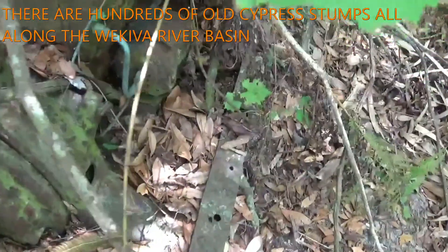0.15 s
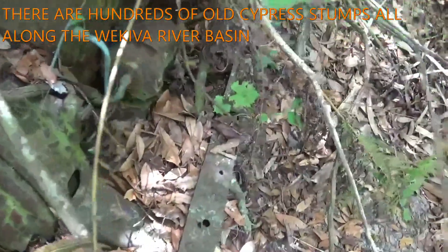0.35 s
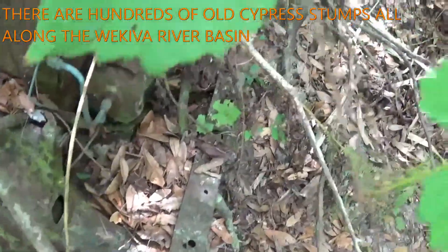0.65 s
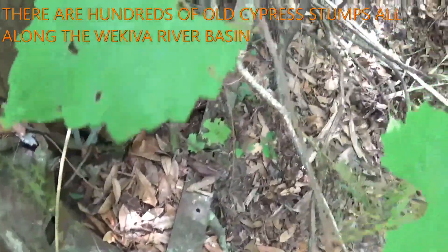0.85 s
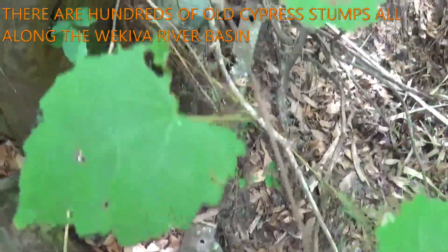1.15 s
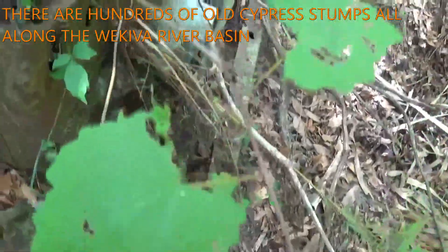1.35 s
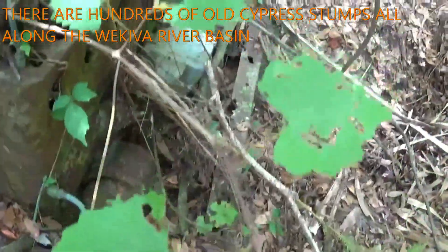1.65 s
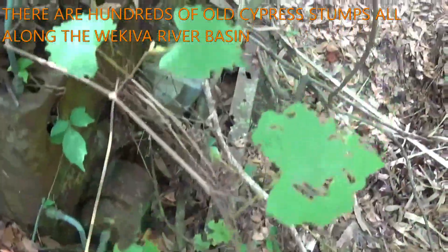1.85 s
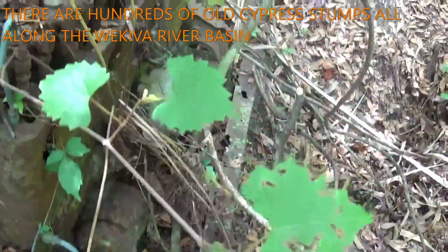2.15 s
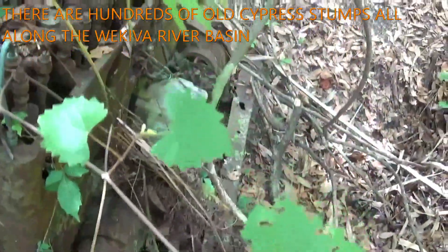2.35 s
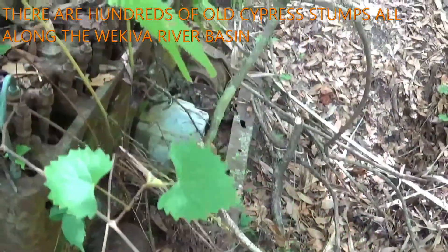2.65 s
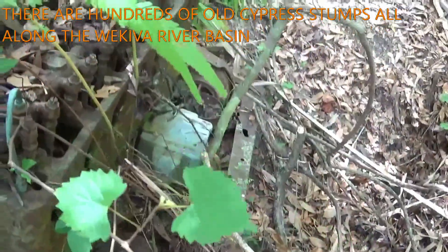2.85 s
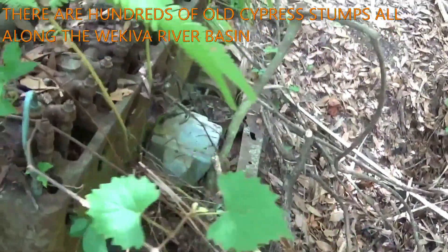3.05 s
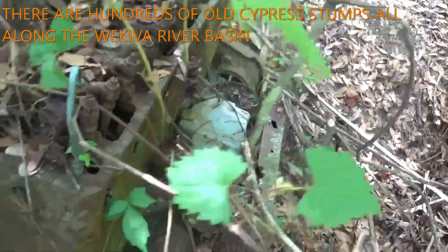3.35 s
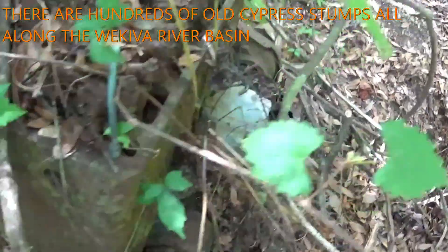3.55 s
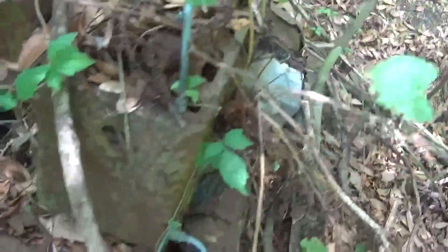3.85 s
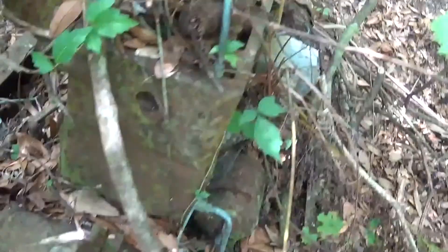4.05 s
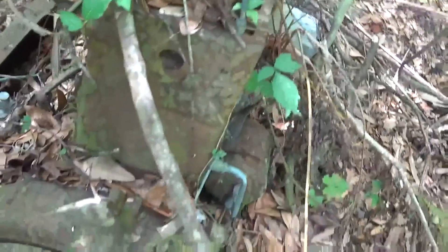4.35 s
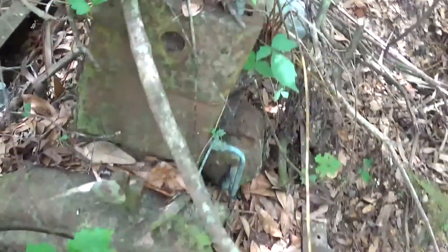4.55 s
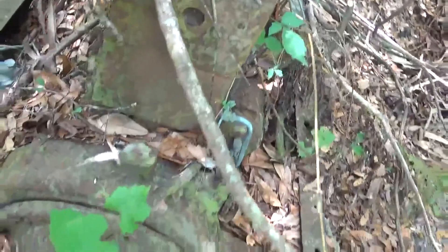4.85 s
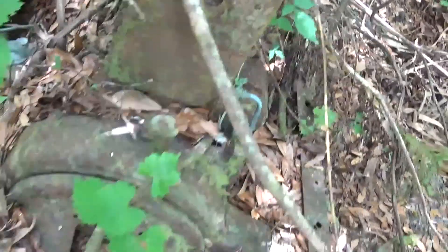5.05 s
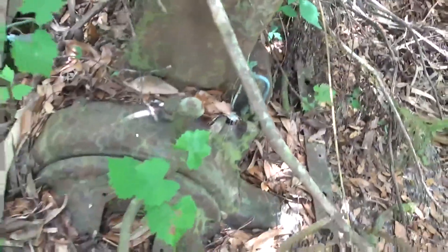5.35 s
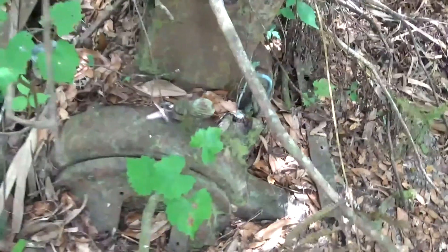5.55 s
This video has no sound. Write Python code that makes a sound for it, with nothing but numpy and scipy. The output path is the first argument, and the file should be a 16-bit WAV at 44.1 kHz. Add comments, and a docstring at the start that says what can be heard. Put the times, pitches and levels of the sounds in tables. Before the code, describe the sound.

Close stereo microphone over a leafy woodland floor: crisp leaves crackle and scratch as someone shifts weight, a twig snaps, then it nearly quiets. One bright, heavy crush follows, then sparse ticks, a renewed bout of rustling with a woody stick crack, and loose single snaps. The sound is dry and crisp, with soft hiss, gentle rumble and a wavering faint hum beneath.

```python
"""Slow footsteps through dry leaf litter and twigs in a wood, heard close by over a thin hiss and a faint, far hum.
Leaves and stalks snap one by one: each snap is a click with bursts of noise, coloured by what breaks.
The rustle and one heavy crush are crowds of tiny decaying sine grains mixed with noise; scrapes are short strokes of them.
A twig, a stick and a stalk ring as fading sines. The hiss and a low rumble are coloured noise; the hum is a wavering sine."""
import sys
import numpy as np
from scipy.fft import rfft, irfft, next_fast_len
from scipy.io import wavfile
from scipy.ndimage import uniform_filter1d, map_coordinates

SR = 44100
rng = np.random.default_rng(int(sys.argv[2]) if len(sys.argv) > 2 else 0)


def store_wav(level_fs):
    """Save 16-bit WAV to argv[1]."""
    pcm = np.round(np.clip(np.atleast_2d(level_fs), -1, 1) * 32767)
    wavfile.write(sys.argv[1], SR, pcm.T.astype(np.int16))


N = 252252
TOP_HZ = 11120  # the whole sound stops steeply here

# How hard the feet work in the litter: (time [s], effort [dB])
EFFORT = [(0, -39.5), (.13, -37), (.24, -46.5), (.33, -44), (.42, -52), (.75, -51), (1.0, -57), (1.17, -55),
          (1.3, -65), (1.72, -63), (2.16, -50.5), (2.28, -53), (2.68, -58.5), (2.78, -45.5), (3.12, -52),
          (3.39, -42), (3.9, -50.5), (4.15, -54.5), (4.43, -49), (4.75, -54), (5.72, -51)]


def amp(db):
    """Turn decibels into a plain factor."""
    return 10 ** (np.asarray(db) / 20)


def unit(x):
    """Scale x to an rms of 1."""
    return x / np.sqrt(np.mean(x ** 2) + 1e-20)


def along(points, hz):
    """Read a curve of (frequency [Hz], value) points on a log frequency axis."""
    f, value = np.transpose(points)
    return np.interp(np.log(hz + 1), np.log(f + 1), value)


def curves(rows):
    """One value per sample for each column after the time."""
    s, *columns = np.transpose(rows)
    return [np.interp(np.arange(N) / SR, s, column) for column in columns]


def wobble(rate):
    """A smooth random curve with this many random points a second."""
    points = rng.standard_normal(int(N * rate / SR) + 4)
    return map_coordinates(points, [np.arange(N) * rate / SR])


def filtered(x, response):
    """Multiply the spectrum of x by a response that depends on frequency."""
    m = next_fast_len(N + SR // 2)  # spare room, so that the end does not wrap round
    hz = np.fft.rfftfreq(m, 1 / SR)
    return irfft(rfft(x, m) * response(hz), m)[..., :N]


def coloured(x, spectrum):
    """Give x a colour of (frequency [Hz], level [dB]) points, at rms 1."""
    return unit(filtered(x, lambda hz: amp(along(spectrum, hz))))


def causal(gain):
    """The minimum-phase response with this gain: it rings only after the blow."""
    cepstrum = irfft(np.log(gain + 1e-6))
    half = len(cepstrum) // 2
    cepstrum[1:half] *= 2
    cepstrum[half + 1:] = 0
    return np.exp(rfft(cepstrum))


def noise_pair(width):
    """Stereo white noise; width is the side signal over the middle one."""
    mid, side = rng.standard_normal((2, N))
    return unit(np.array([mid + width * side, mid - width * side]))


def add(track, s, sound):
    """Mix a sound in at time s [s]."""
    start = max(0, round(s * SR))
    part = sound[..., :max(0, N - start)]
    track[..., start:start + part.shape[-1]] += part


def swells(rows, attack, fall_db_per_s):
    """The gain of (time [s], hold [s], level [dB]) events that rise, hold and die away."""
    t = np.arange(N) / SR
    power = 0
    for s, hold, db in rows:
        rise = np.clip((t - s) / attack, 0, 1)
        fall_db = fall_db_per_s * np.maximum(t - s - hold, 0)
        power = power + (rise * amp(db - fall_db)) ** 2
    return np.sqrt(power)


def crackle(rate, spread_db, cycles, pitch_hz, pan_db, size=128):
    """Tiny leaf fractures, each a few cycles long: most are weak, a few are strong."""
    when, pitch, strength, side, life = rng.random((int(rate * N / SR), 5)).T[..., None]
    hz = pitch_hz * 2 ** (2 * pitch - 1)  # up to an octave either way
    k = np.arange(size)
    phase = hz * k / SR  # in cycles
    gain = amp(-spread_db * np.log(strength + 0.074))
    grains = gain * np.sin(2 * np.pi * phase) * np.exp(-phase / (cycles * (.5 + life)))
    index = ((when * N).astype(int) + k).ravel()
    pair = []
    for ear in (1, -1):
        panned = grains * amp(ear * pan_db * (side - .5))
        pair.append(np.bincount(index, panned.ravel(), N)[:N])
    return unit(np.array(pair))


def whitened(x, size=3001):
    """Even out the long-term colour of x."""
    z = rfft(x)
    power = uniform_filter1d(np.mean(np.abs(z) ** 2, 0), size)
    return unit(irfft(z / np.sqrt(np.abs(power) + 0.00051 * power.mean()), N))


def background(hiss_db=-57, rumble_db=-54.0, hum_hz=109, drift_db=2):
    """A steady hiss and a low rumble of coloured noise, with a far hum that wavers in level and pitch."""
    # Colour of the hiss: (frequency [Hz], level [dB per Hz])
    air_colour = [(150, -10.5), (250, -1.5), (887, -9.5), (1020, -10), (1180, -11), (1280, -11.5),
                  (2960, -14.5), (3990, -15), (9240, -14), (11000, -20), (14300, -56), (22000, -120)]
    # Colour of the rumble: (frequency [Hz], level [dB per Hz])
    rumble_colour = [(12, -38), (20, -26), (38, 1), (65, -2), (102, 2.5), (242, -10), (323, -16),
                     (400, -24.5), (520, -53), (880, -120)]
    # The hum comes and goes: (time [s], level [dB])
    hum_level = [(0, -60), (4.1, -62), (4.5, -57), (5.2, -57.5), (5.72, -62)]
    hum_db, = curves(hum_level)
    phase = 2 * np.pi * hum_hz * np.arange(N) / SR
    strength = amp(drift_db * wobble(3.05)) * (1 + 0.59 * wobble(14))
    hum = unit(strength * np.sin(phase + 1.77 * wobble(14)))
    rumble = coloured(noise_pair(width=0.055), rumble_colour)
    hiss = coloured(noise_pair(width=0.7), air_colour)
    return amp(hiss_db) * hiss + amp(rumble_db) * rumble + amp(hum_db) * hum


def ringing(event, modes, attack=0.00037):
    """The freed end of broken wood rings briefly, as a sum of fading sines."""
    out, t = np.zeros(N), np.arange(SR // 10) / SR
    s, db = event
    ring = 0
    for hz, level, t60 in modes:
        ring = ring + amp(db + level - 60 * t / t60) * np.sin(2 * np.pi * hz * t)
    add(out, s, ring * (1 - np.exp(-t / attack)))
    return out


def breaking_wood():
    """A thin twig, a thick stick and a dry stalk give way; each rings at its own few pitches."""
    # When each breaks: (time [s], level before the mode levels are added [dB])
    twig_break = (0.7958, -19.5)
    stick_break = (3.6975, -29)
    stalk_break = (5.0386, -35)
    # How each rings: (frequency [Hz], level against the break [dB], time to fall 60 dB [s])
    twig_modes = [(1400, -5, 0.014), (1900, -1, 0.016), (2540, -17, 0.012), (3950, 6, .009),
                  (6440, 0.5, 0.039), (7149, -2, .022)]
    stick_modes = [(195, -10.5, 0.07), (770, 3, .024), (1150, 0, 0.022), (1700, 2, 0.023)]
    stalk_modes = [(3050, 0, .02)]
    twig = ringing(twig_break, twig_modes)
    stick = ringing(stick_break, stick_modes)
    return twig + stick + ringing(stalk_break, stalk_modes)


def scrapes(level_db=3.0, fade_db=5, edge=0.0065):
    """A leaf dragged across its neighbours catches many times: a short, even scratch."""
    # Leaves sliding over one another: (time [s], length [s], level before level_db [dB])
    strokes = [(0.775, 0.066, -42), (1.042, 0.063, -50), (1.426, 0.061, -46.5), (2.417, 0.029, -48),
               (3.205, .04, -44), (3.7, 0.045, -45), (4.395, 0.065, -45.5), (4.708, .025, -45),
               (5.407, .02, -47), (5.488, 0.057, -44)]
    # Colour of the sliding: (frequency [Hz], level [dB per Hz])
    slide_colour = [(200, -18), (700, -4), (1600, -2), (3500, -7.5), (6000, -1.5), (9000, 2), (11000, 0.5)]
    gain, t = np.zeros(N), np.arange(SR // 5) / SR
    for s, length, db in strokes:
        stroke = np.clip(np.minimum(t, length - t + edge) / edge, 0, 1)
        add(gain, s, stroke * amp(db + level_db - fade_db * t / length))
    grains = crackle(rate=2000, spread_db=5.0, cycles=1.8, pitch_hz=4930, pan_db=8)
    catches = whitened(grains) + 0.61 * noise_pair(width=0.51)
    return gain * coloured(catches, slide_colour)


def rustle(crisp_db=-1, packed_db=-62, scuff_db=-68, press_db=-2, thud_db=-1):
    """Shifting weight cracks crisp leaves in clumps; a sinking sole creases packed ones, scuffs soil and thuds."""
    # A sole sinks in: (time [s], hold [s], packed leaves before press_db [dB], soil before press_db [dB])
    presses = [(0, 0.093, -50, -52), (.07, .06, -45, -49), (.25, 0.13, -52.5, -54.5),
               (0.403, 0.055, -55, -57), (.54, .13, -52.5, -50), (0.858, 0.05, -58, -54),
               (1.79, .04, -64, -47.5), (2.016, .13, -60, -60.5), (2.532, 0.027, -59, -60),
               (3.11, .1, -69, -59), (3.208, .1, -64, -52.5), (3.35, .07, -55, -59), (4.38, .06, -58, -61)]
    # Colours of the top leaves, the packed leaves, the soil and the ground under a sole:
    # (frequency [Hz], level [dB per Hz])
    crisp_colour = [(880, -67), (1500, -12.5), (1950, -15), (4280, -16), (5970, -7), (6670, -7.5),
                    (9370, -1.5), (10900, -8), (11500, -60), (15000, -49), (22000, -120)]
    packed_colour = [(300, -13.5), (800, -2), (1500, -3.5), (3000, 1.5), (6000, -8.5), (11000, -21)]
    soil_colour = [(120, -17), (300, -4), (550, -3.5), (900, -6), (1500, -10), (4000, -37)]
    thud_colour = [(20, -20), (45, 1.5), (90, -2), (170, -5), (330, -16), (700, -50)]
    usual_effort_db = -52
    packed_follows, soil_follows = 0.54, 0.3  # deeper layers answer the effort less [dB per dB]
    attack, fall_db_per_s = 0.023, 98

    effort_db, = curves(EFFORT)
    extra_db = effort_db - usual_effort_db
    s, hold, leaves_db, soil_db = np.transpose(presses)
    on_leaves = swells(zip(s, hold, leaves_db + press_db), attack, fall_db_per_s)
    on_soil = swells(zip(s, hold, soil_db + press_db), attack, fall_db_per_s)
    clumps = wobble(85)

    fine_grains = crackle(rate=650, spread_db=6.5, cycles=2.4, pitch_hz=6650, pan_db=3.5)
    fine = whitened(fine_grains) + 0.55 * noise_pair(width=0.42)
    top = amp(effort_db + crisp_db + 2.63 * clumps) * coloured(fine, crisp_colour)

    coarse_grains = crackle(rate=400, spread_db=3.5, cycles=2.0, pitch_hz=2330, pan_db=15.5, size=256)
    coarse = whitened(coarse_grains) + 1.27 * noise_pair(width=0.67)
    packed_gain = np.hypot(on_leaves, amp(packed_db + packed_follows * extra_db))
    under = packed_gain * amp(1.5 * clumps) * coloured(coarse, packed_colour)

    soil_gain = np.hypot(on_soil, amp(scuff_db + soil_follows * extra_db))
    scuff = soil_gain * amp(3.7 * wobble(45)) * coloured(noise_pair(width=0.51), soil_colour)
    thud = on_leaves * amp(thud_db) * coloured(noise_pair(width=0.12), thud_colour)
    return top + under + scuff + thud


def crush(spurt_db=1.35):
    """A full step breaks thousands of leaves in quick spurts and dies away as the heap packs down."""
    # The heavy step lands, settles and rolls forward: (time [s], hold [s], level [dB])
    step = [(1.769, .1, -28.5), (1.96, 0.09, -46.5), (2.046, 0.022, -39)]
    # Colour of the breaking heap: (frequency [Hz], level [dB per Hz])
    heap_colour = [(88, -48), (150, -16), (415, -20), (497, -17.5), (755, -15.5), (842, -14), (1330, -12),
                   (2790, -7.5), (5360, -8.5), (9250, -1), (10900, -8.5), (11500, -45), (15000, -57),
                   (22000, -120)]
    weight = swells(step, attack=0.0098, fall_db_per_s=151)
    grains = crackle(rate=3500, spread_db=5, cycles=1.4, pitch_hz=6100, pan_db=3)
    breaks = whitened(grains) + 0.8 * noise_pair(width=0.45)
    return weight * amp(spurt_db * wobble(130)) * coloured(breaks, heap_colour)


def small_snaps():
    """Rows for snaps() at random moments, louder where the feet work harder."""
    per_s, over_effort_db, level_spread_db = 10, 7, 1.5
    usual_knock_db, usual_wood_db, colour_spread_db = -17, -12, 7
    when = rng.uniform(0, N / SR, int(per_s * N / SR))
    level, knock, wood = rng.standard_normal((len(when), 3)).T
    db = np.interp(when, *np.transpose(EFFORT)) + over_effort_db + level_spread_db * level
    knock_db = usual_knock_db + colour_spread_db * knock
    wood_db = usual_wood_db + colour_spread_db * wood
    return list(zip(when, db, knock_db, wood_db))


def snaps(rows, pan_spread_db=0.9, ripple_db=3.5, tear=1.09, tear_t60=0.0055, strain=0.3,
          strain_t60=0.004, scatter=0.4, scatter_t60=0.049, bounce=0.058, size=4096):
    """Fibres give way, the leaf breaks and tears on; the snap rings in the leaf and scatters off the ground."""
    lead, window = SR // 250, SR // 200  # samples before the break, and samples that set the level
    crack_per_wood = 0.7  # woodier pieces also crack harder around 5 kHz [dB per dB]
    out, t = np.zeros((2, N)), (np.arange(size) - lead) / SR
    hz = np.fft.rfftfreq(size, 1 / SR)
    for s, db, knock_db, wood_db in rows:
        crack_db = crack_per_wood * wood_db
        pan_db = pan_spread_db * rng.standard_normal()
        chance = rng.standard_normal((5, size))
        before = unit(chance[0] * (t < 0) * amp(-60 * np.abs(t) / strain_t60))
        after = unit(chance[0] * (t > 0) * amp(-60 * np.abs(t) / tear_t60))
        echo = (t > 0) * amp(-60 * t / scatter_t60)
        litter = unit(chance[1] * echo) + 0.73 * unit(chance[2:4] * echo)
        force = (strain * before + tear * after + scatter * litter) / np.sqrt(size)
        force[:, lead] += 1  # the break itself
        force[:, lead + int(SR * rng.uniform(.004, .009))] += bounce  # off the ground
        # every leaf has its own resonances
        leaf_db = ripple_db * map_coordinates(chance[4], [hz / 380], mode="mirror")
        rung = rfft(force) * causal(amp(leaf_db))
        # the resonances give the fine detail; the thickness of what breaks sets the broad colour
        power = uniform_filter1d(np.mean(np.abs(rung) ** 2, 0), size=150)
        broad = np.sqrt(np.abs(power) + 1e-6)
        colour = along([(60, knock_db - 28), (300, knock_db - 9), (850, knock_db), (2200, wood_db),
                        (5500, crack_db), (9000, 5), (11000, -3.0)], hz)
        spectrum = rung * causal(amp(colour) / broad)
        heard = irfft(spectrum * (hz < TOP_HZ))[:, lead:lead + window]
        snap = irfft(spectrum) / np.sqrt(np.mean(heard ** 2))
        add(out, s - lead / SR, amp(db) * amp([[pan_db / 2], [-pan_db / 2]]) * snap)
    return out


def scene():
    """Everything underfoot comes from where the feet are; the background lies all around."""
    # The clearest leaves and twigs snapping:
    # (time [s], level [dB], knock colour at 850 Hz [dB], wood colour at 2200 Hz [dB])
    clear_snaps = [(.0176, -30, -30, -13), (.0348, -27, -26, -15), (.1087, -29.5, -7, -15),
                   (.1559, -25.5, -12, -16), (.2812, -26.5, -0.5, -6), (.301, -36, -8, -12),
                   (.336, -33.5, -2, 4), (.44, -24.5, -13.5, -3.5), (.5279, -39, 14, 13),
                   (.604, -43, 7, 11), (.7955, -20, -16, 6), (.9063, -37, 5.5, -5.5),
                   (1.047, -40, -30, -15), (1.0568, -42.5, 14, 9), (1.1095, -36, -21, -5),
                   (1.1905, -43, -12, -9), (1.2445, -46, -5, 2.5), (1.3404, -44.5, 2, 15),
                   (1.4335, -40.5, -9, -4), (1.5009, -35.5, -3.5, -7), (1.6487, -35, -15, -12),
                   (1.6921, -40, -26, -43), (1.7678, -40, -18, -20), (1.7737, -19, -24, -26),
                   (1.8439, -28.5, -20, -6), (1.86, -30, -14, -9), (1.9949, -32, -27, -20),
                   (2.0767, -35.5, -19, -12), (2.1654, -41, -17, 0), (2.1827, -40.5, -18, -10),
                   (2.4553, -43, -20, -9), (2.5534, -35.5, 4.5, 1.5), (2.5616, -37, 1, -8),
                   (2.5769, -40.5, 11, 3), (2.6054, -42, -4, -2), (2.7562, -35.5, -22, -12),
                   (2.7697, -30.5, -20, -20), (2.9099, -37.5, -19, -5), (2.9978, -44, 2, 8),
                   (3.008, -36, -28, -27), (3.0669, -41.5, -23, -13), (3.115, -40.5, 9.5, -3.5),
                   (3.1718, -36.5, -16, -12), (3.2128, -32, -14, -18), (3.2202, -32, -13, -12),
                   (3.32, -32, -28, -26), (3.4654, -31.5, -6, -14), (3.485, -31.5, -35, -20),
                   (3.5522, -31.5, -29, -19), (3.5607, -29.5, -30, -20), (3.638, -33.5, -4, -15),
                   (3.6559, -31, -3.5, -18), (3.6973, -23, -3.5, -15.5), (3.7036, -26.5, -13, -18),
                   (3.7209, -34.5, -35, -19), (3.7737, -31, -28, -18), (3.808, -40, 0, -5),
                   (3.8304, -37, -7, -3), (3.8716, -39.5, -12, -1), (3.943, -38.5, 1, -10),
                   (4.0704, -30, -16, -13.5), (4.097, -38, -10, -14), (4.1293, -36, -26, -21),
                   (4.1947, -40.5, -18, -4.5), (4.2538, -44.5, 7, -3), (4.2727, -40, -1, 0),
                   (4.3426, -36.5, -10, -9), (4.4046, -38, -12, -15), (4.512, -33, -21, -12),
                   (4.5217, -24.5, -32, -21), (4.7185, -38, -1, 0), (4.7653, -40.5, -7, -5),
                   (4.7853, -40, -17, -1), (4.8407, -42, -27, -20), (5.0385, -40, -28, -6),
                   (5.0666, -38, -34, -30), (5.1108, -37.5, -28, -17), (5.1299, -38, 10.5, 7),
                   (5.1815, -32.5, -7, -13), (5.3178, -34.5, -6, -16), (5.492, -27.5, -25, -10.5),
                   (5.5393, -42, 12, 6), (5.5889, -36.5, -14, -17), (5.7054, -24.5, -40, -45)]
    # Where the feet are: (time [s], left over right [dB])
    bearing = [(0, 2), (1.55, 1.5), (1.8, -2.5), (2.4, 1.5), (3.6, 1.5), (5.72, 0)]
    pan_db, = curves(bearing)
    around = background()
    litter = scrapes() + rustle() + crush()
    underfoot = breaking_wood() + litter + snaps(clear_snaps) + snaps(small_snaps())
    return around + underfoot * amp([pan_db / 2, -pan_db / 2])


def record(dry):
    """A very steep low-pass filter removes what lies above the band limit."""
    return filtered(dry, lambda hz: 1 / np.sqrt(1 + (hz / TOP_HZ) ** 200))


dry = scene()
out = record(dry)
store_wav(out)
```